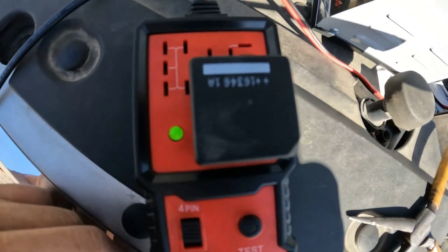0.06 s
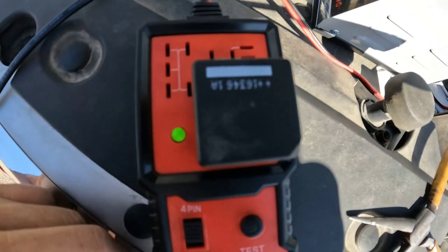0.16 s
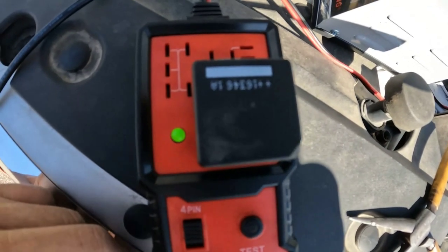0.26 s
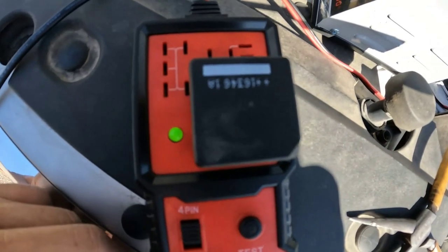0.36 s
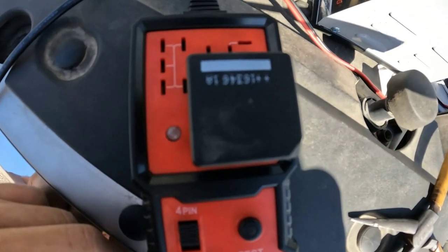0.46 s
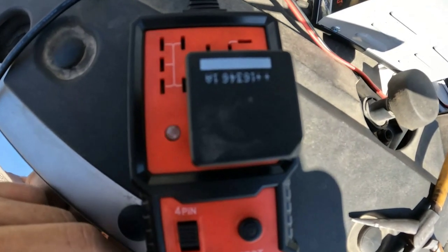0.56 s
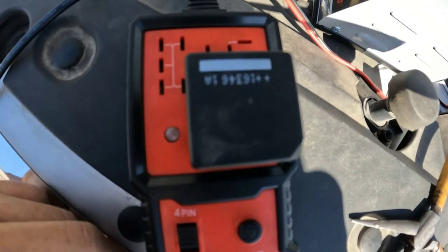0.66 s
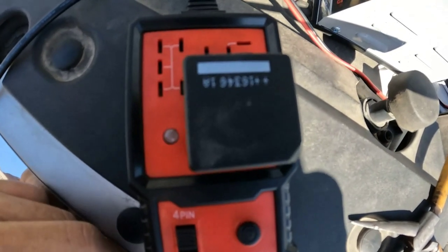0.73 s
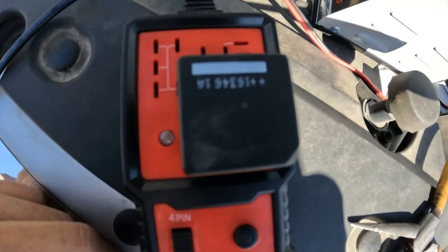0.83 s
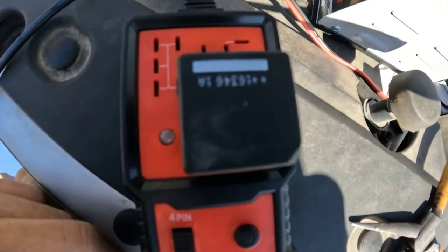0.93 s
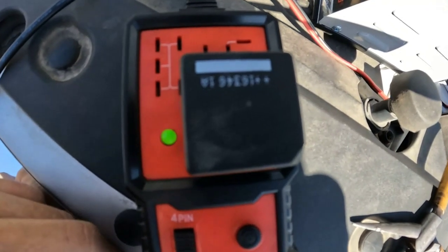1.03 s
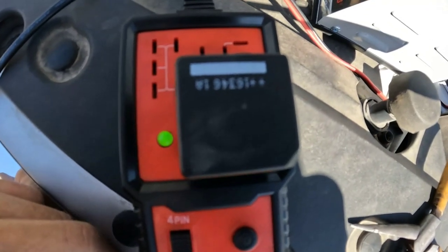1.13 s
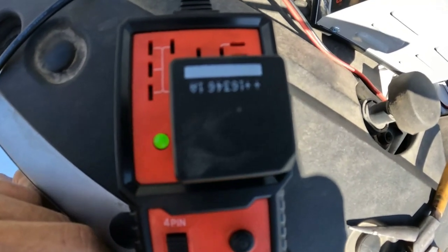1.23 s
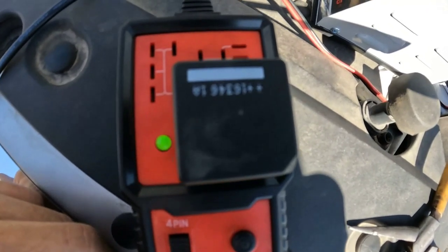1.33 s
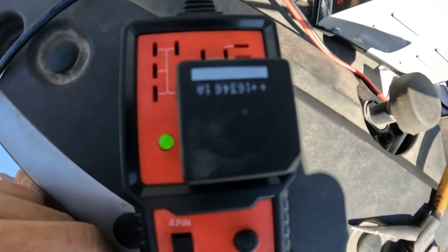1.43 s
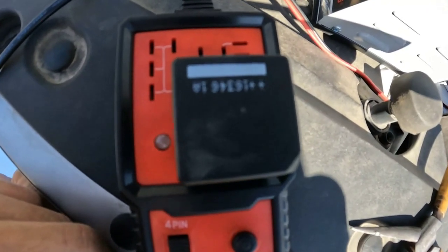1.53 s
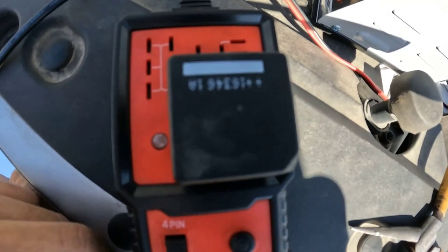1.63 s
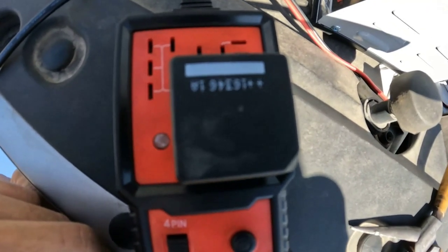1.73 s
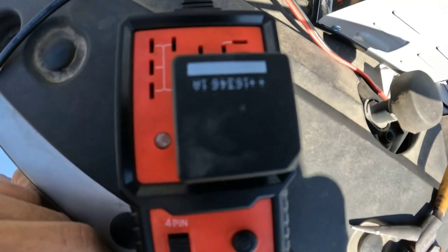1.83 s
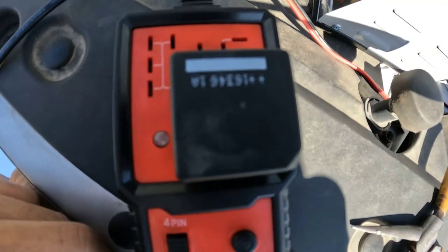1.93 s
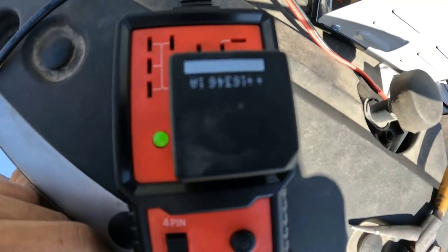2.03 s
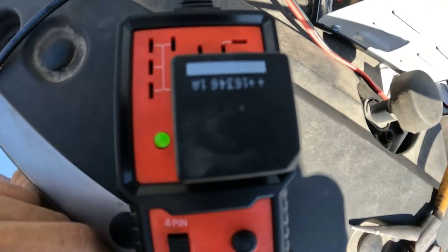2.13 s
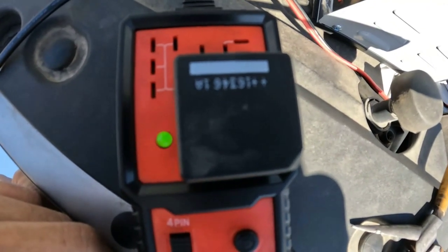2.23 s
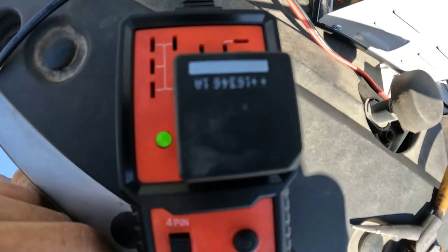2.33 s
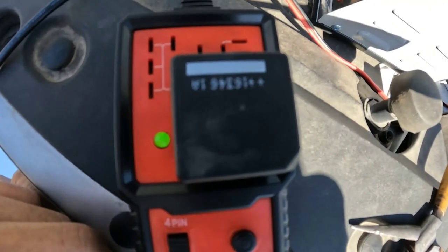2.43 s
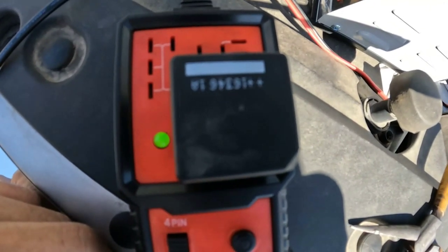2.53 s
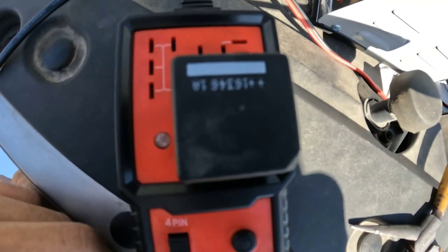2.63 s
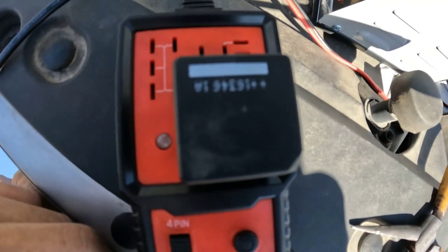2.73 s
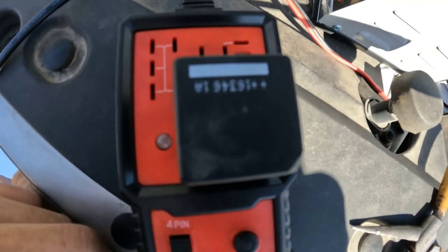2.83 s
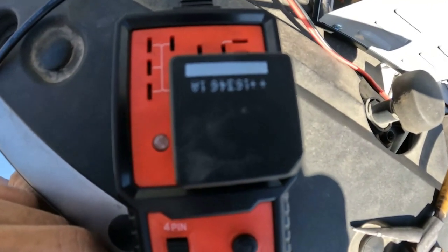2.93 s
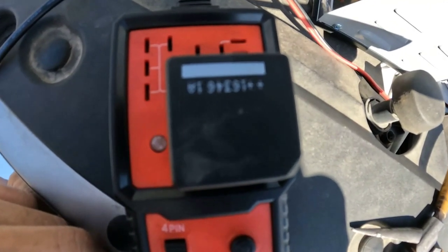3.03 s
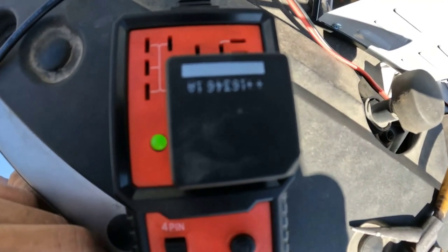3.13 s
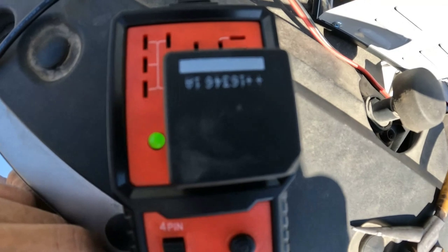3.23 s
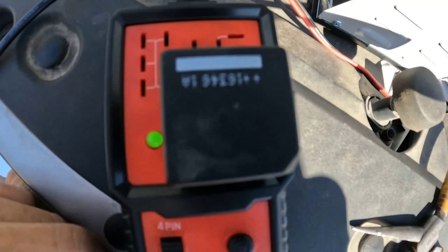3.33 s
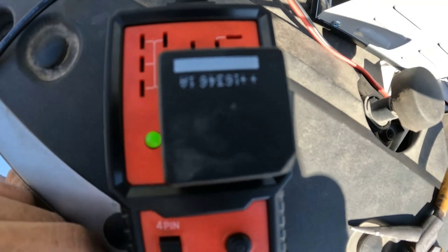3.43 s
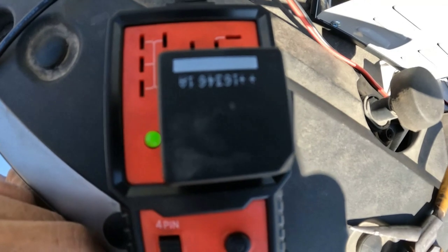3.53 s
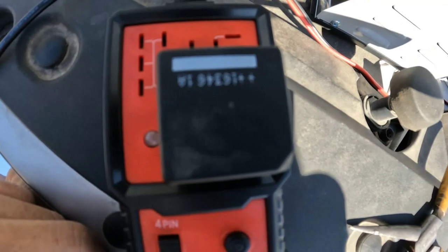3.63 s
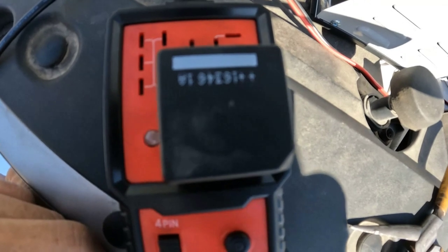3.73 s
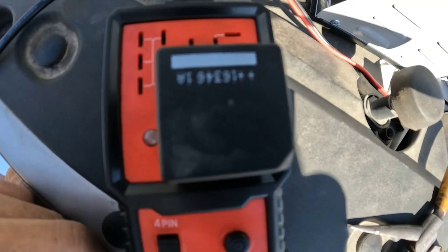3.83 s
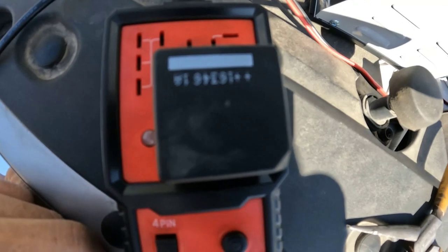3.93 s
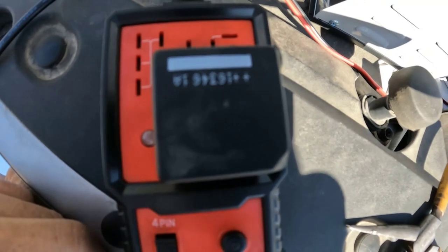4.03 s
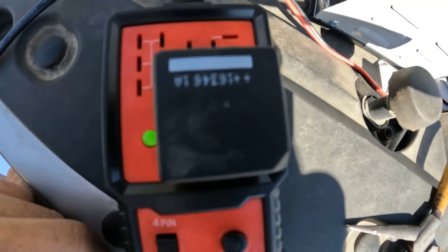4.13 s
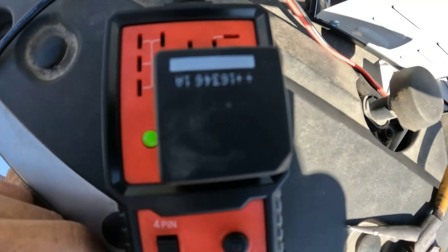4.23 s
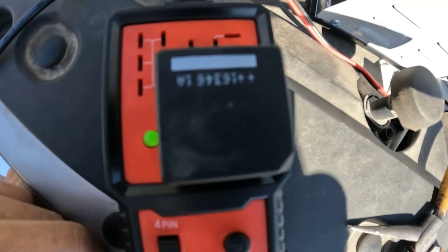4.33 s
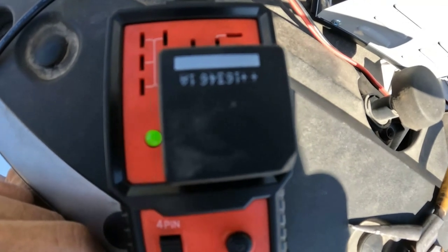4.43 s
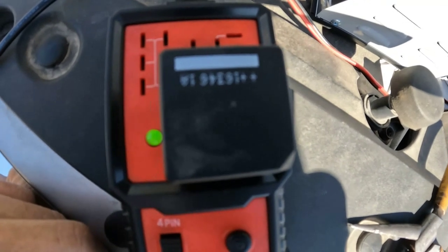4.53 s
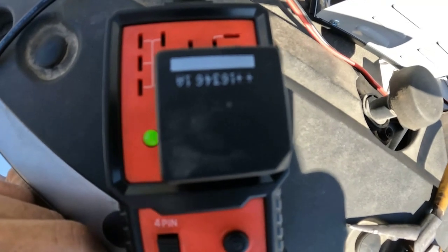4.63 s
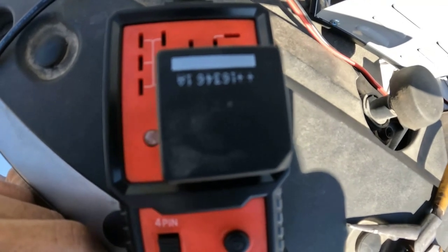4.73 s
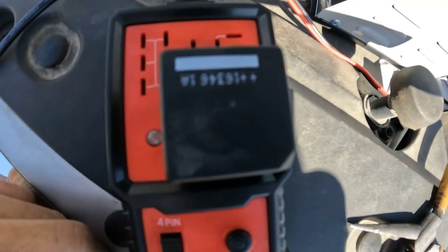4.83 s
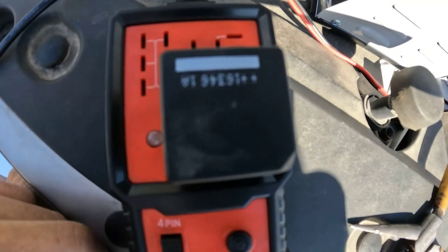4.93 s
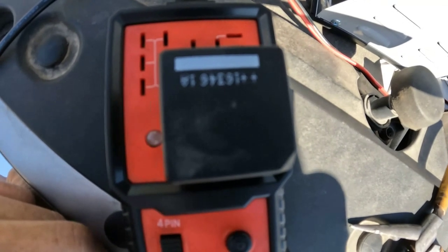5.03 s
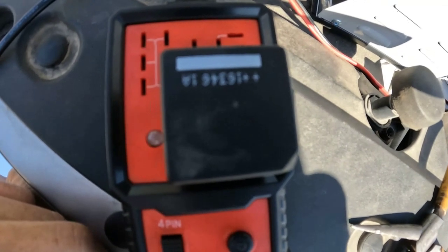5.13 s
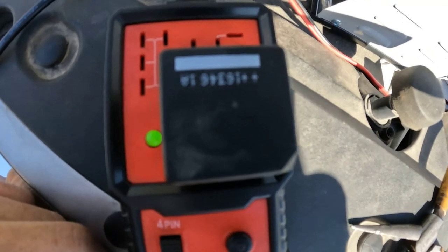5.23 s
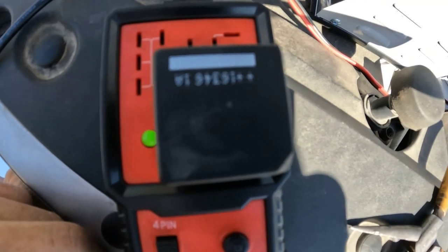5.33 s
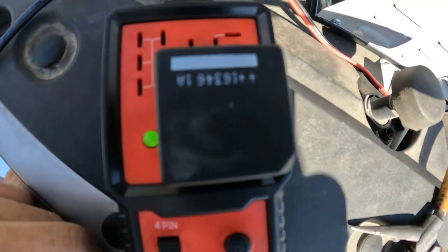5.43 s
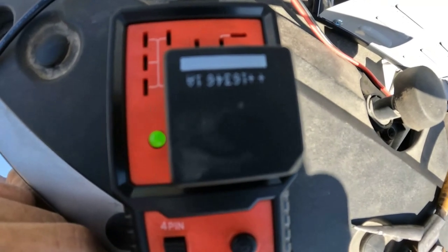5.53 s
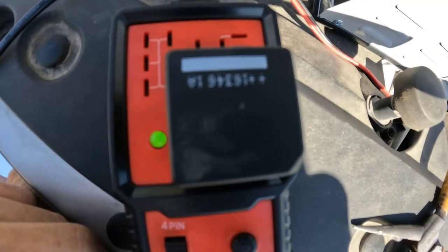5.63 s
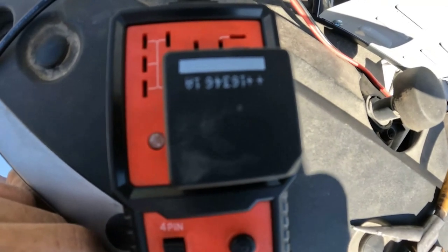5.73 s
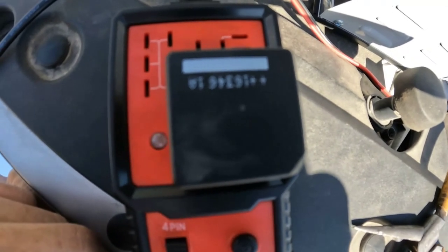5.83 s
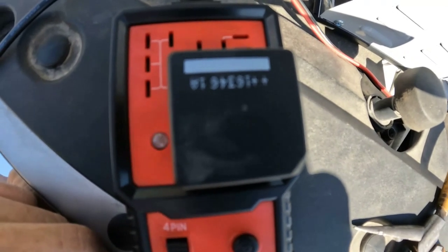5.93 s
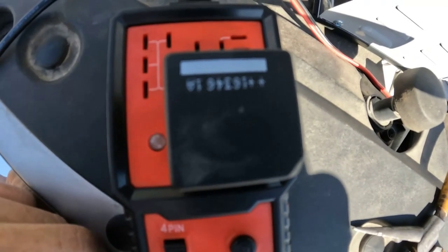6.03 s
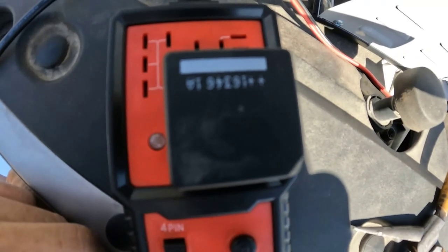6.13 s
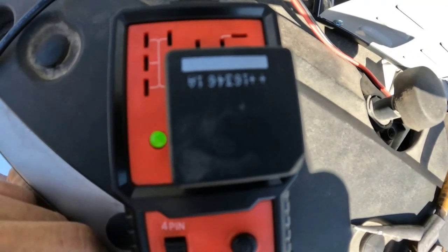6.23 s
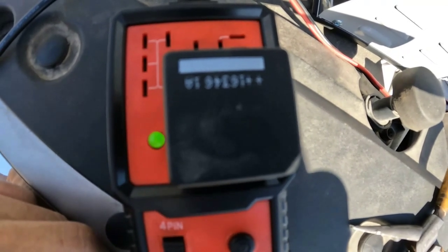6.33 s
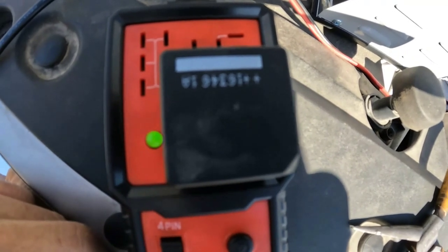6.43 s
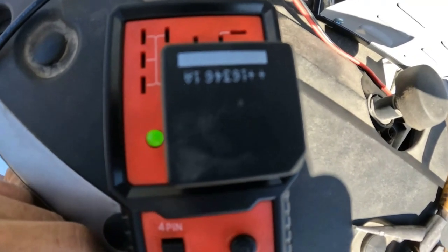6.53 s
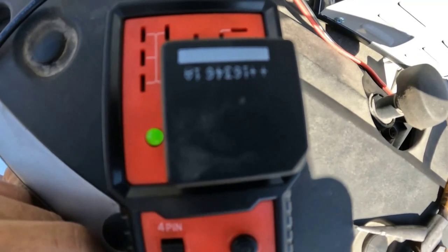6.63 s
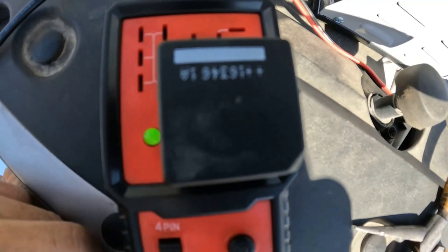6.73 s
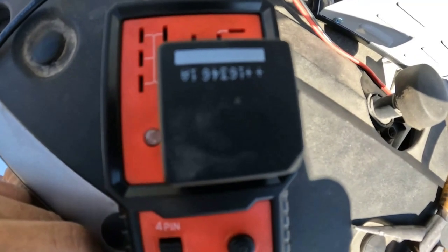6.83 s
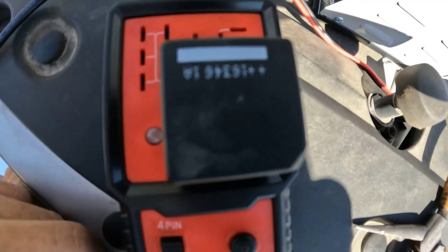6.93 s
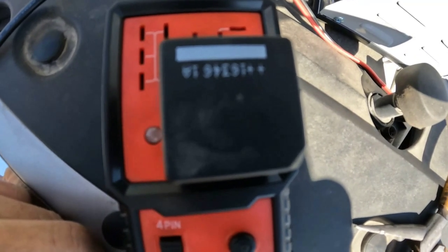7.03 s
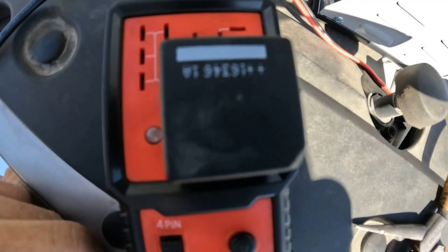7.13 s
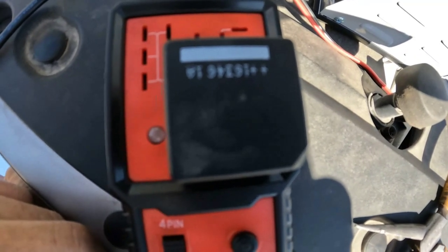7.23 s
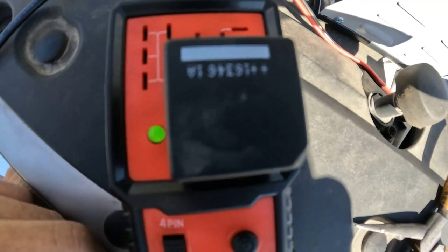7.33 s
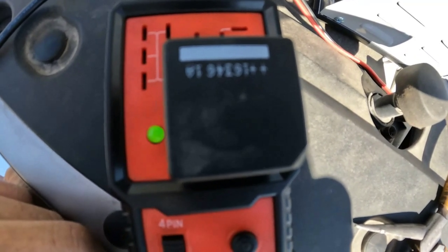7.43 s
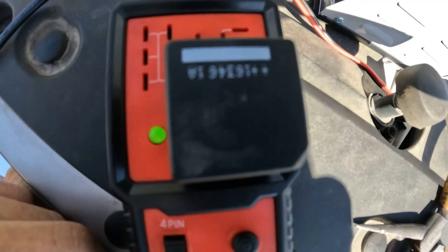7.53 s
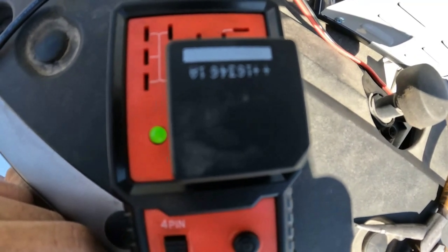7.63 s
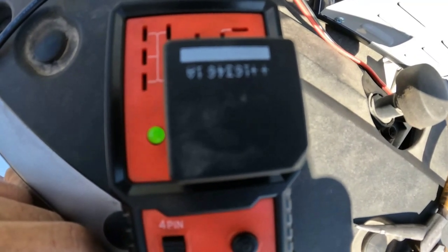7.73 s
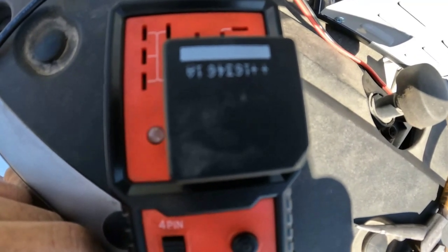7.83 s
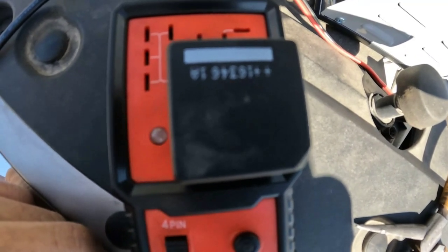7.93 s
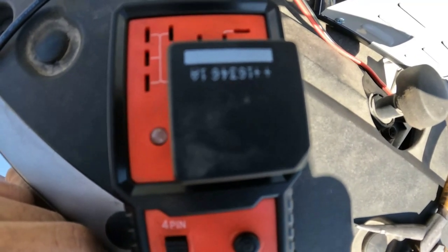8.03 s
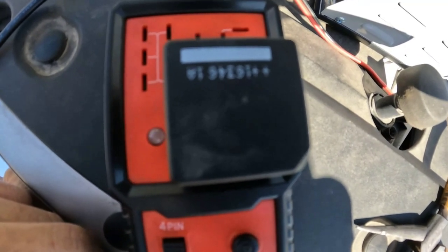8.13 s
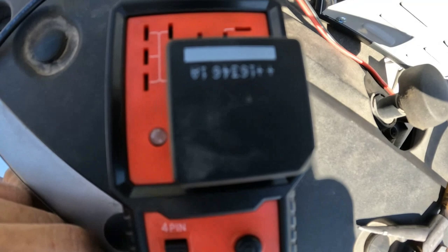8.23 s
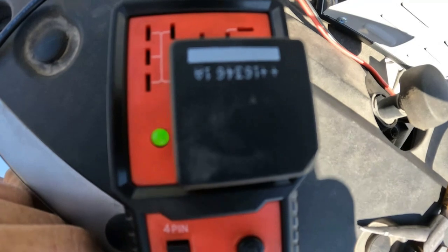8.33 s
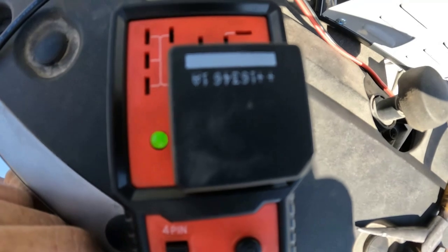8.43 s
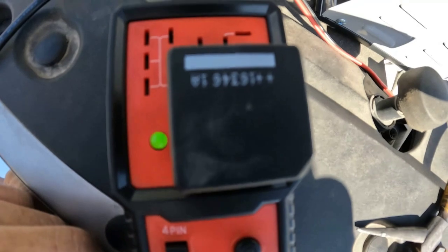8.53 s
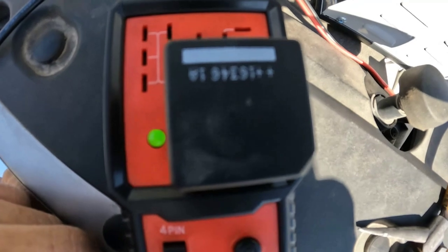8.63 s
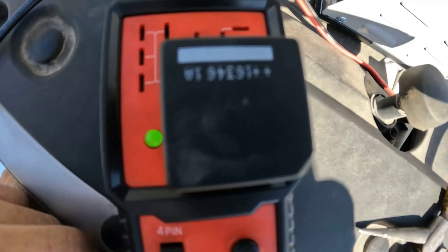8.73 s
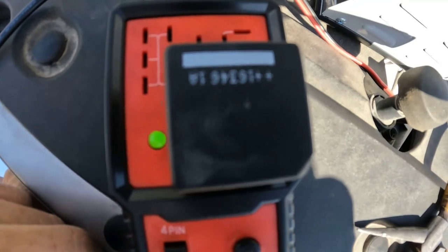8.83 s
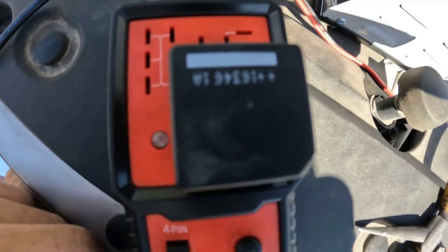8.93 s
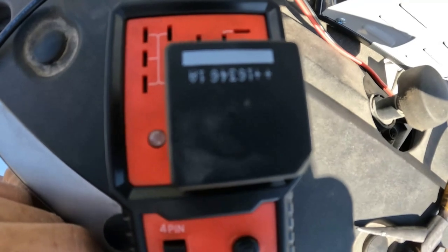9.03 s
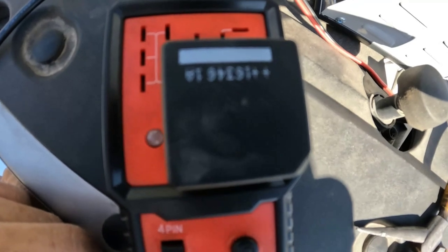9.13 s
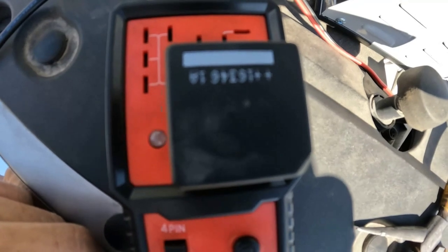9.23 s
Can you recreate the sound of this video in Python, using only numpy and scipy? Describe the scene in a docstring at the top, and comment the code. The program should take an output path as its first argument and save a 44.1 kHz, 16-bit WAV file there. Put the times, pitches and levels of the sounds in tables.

```python
"""Relay test in gusty wind

A hand-held tester's timer pulls a car relay in and lets it drop out about once a second, up close.
Each stroke rings the armature, the contacts, then the plastic housing; the spring rings on and the
engine bay echoes. Gusts flutter and buffet the microphone with a low rumble. Behind them sit a
workshop's fans and a far motor that dies away early on."""
import sys
import numpy as np
from scipy import signal
from scipy.fft import rfft, irfft, next_fast_len
from scipy.io import wavfile
from scipy.ndimage import uniform_filter1d

SR = 44100
rng = np.random.default_rng(int(sys.argv[2]) if len(sys.argv) > 2 else 0)


def to_wav(s):
    """Save 16-bit WAV."""
    ch = np.atleast_2d(s).T  # columns
    pcm = np.round(np.clip(ch, -1, 1) * 32767)  # PCM
    wavfile.write(sys.argv[1], SR, pcm.astype(np.int16))


N = 408807
T = np.arange(N) / SR

# modes of relay and housing, armature closed and open: pitch_hz, level_db, usual_t60_ms, onset_lag_ms
CLOSED_MODES = [(498, -21.3, 25.4, 1.38), (689, -18.2, 19.3, 3.12), (1151, -29.9, 40.0, 0.0),
                (1385, -33.7, 40.0, 0.23), (1701, -21.2, 9.1, 0.27), (2017, -37.3, 40.0, 1.38),
                (2123, -18.1, 9.3, 0.27), (2778, -26.9, 19.5, 0.25), (2984, -28.5, 17.9, 0.66),
                (3164, -28.3, 40.0, 0.41), (3368, -15.2, 13.6, 0.0), (4364, -30.6, 25.7, 0.39),
                (5108, -29.4, 15.9, 1.31), (5833, -15.5, 19.4, 1.06), (5763, -24.0, 21.3, 1.41),
                (6109, -10.0, 3.0, 1.02), (7800, -28.7, 13.6, 1.15), (8641, -17.6, 5.1, 0.43),
                (9092, -39.7, 26.3, 0.09), (10322, -30.3, 9.3, 1.44), (11915, -24.5, 5.8, 1.11),
                (13237, -54.2, 13.8, 1.29), (14313, -50.7, 4.9, 1.2)]
OPEN_MODES = [(433, -26.8, 40.0, 4.5), (550, -28.0, 29.4, 3.22), (695, -15.2, 29, 4.97),
              (800, -17.3, 32.0, 3.12), (988, -21.4, 18.7, 1.97), (1264, -25.3, 40.0, 0.77),
              (1474, -14.1, 16.8, 0.08), (1626, -20.4, 40.0, 0.0), (2101, -22.3, 10.2, 1.13),
              (2230, -29, 40.0, 1.37), (2716, -34.5, 40.0, 1.47), (3255, -23.8, 27.1, 1.12),
              (3464, -29.6, 40.0, 1.26), (3594, -25.6, 16.6, 1.46), (3948, -36.1, 40.0, 2.15),
              (4704, -25.0, 10.1, 2.34), (5573, -38.1, 40.0, 2.46), (5992, -29.6, 13.2, 2.25),
              (6632, -36.1, 19.0, 1.48), (7031, -26.1, 10.3, 1.7), (7534, -37.7, 20.7, 2.12),
              (9151, -30.1, 6.5, 1.89), (12110, -42.6, 6.0, 2.32)]
# ring of the return spring and frame: pitch_hz, t60_s, pull_in_db, drop_out_db
SPRING_MODES = [(418, .13, -44, -40), (479, .13, -38, -36), (1235, .33, -51.5, -44.5),
                (1453, .12, -54, -50), (1815, .14, -45, -46), (2207, .16, -42.5, -53),
                (2262, .12, -56, -49), (2422, .14, -68, -53), (2764, .13, -55, -53), (3009, .145, -46, -63),
                (3106, .14, -50, -58), (3276, .125, -48, -53), (3682, .11, -58, -53), (3758, .12, -64, -55),
                (4495, .12, -64, -56), (4549, .12, -58, -65), (4613, .11, -56, -59), (5674, .09, -56, -63),
                (6035, .11, -63, -60), (6228, .125, -51.5, -61), (6950, .09, -70, -60),
                (8796, .08, -59, -72), (11800, .08, -62, -80)]
# how each click sounds, a row per cycle: level_db, treble_db, cutoff_hz, treble_ring_ratio, chatter_db
PULL_INS = [(-1.4, 4, 16000, 1, 0), (-.3, 0, 11500, 1.05, 0), (.1, -.8, 13500, 1.05, -1),
            (.8, -.7, 16000, 1, 4), (.6, -1.3, 14500, .55, -4), (.2, -.3, 16000, 1.1, 0),
            (-.2, -.3, 14500, 1.15, -1), (.3, -.5, 16000, 1, 1), (.3, -.9, 12600, .95, -1)]
DROP_OUTS = [(-.4, -.1, 12200, 1.1, 0), (-.8, -1.2, 12600, 1, -3), (.6, -2.5, 12800, 1, 1),
             (.2, -2, 12600, 1, 0), (.5, -4.8, 12000, .9, 4), (0, -1, 12200, 1.1, 1), (.3, .3, 12400, 1, 0),
             (.3, -.3, 12100, .85, 1), (-.2, .7, 10000, 1, -1)]
# the dropped armature rebounds from its stop: usual_delay_s, level_db
BOUNCES = [(.013, -41), (.021, -41), (.027, -50)]
# stray chatter of a closed contact: start_s, level_db
LATE_CHATTER = [(3.249, -45), (3.255, -42), (3.260, -47), (4.836, -44), (4.840, -49)]
# tone colours of the relay's rattles and the plastic's ticks: frequency_hz, relative_db
CONTACT_COLOUR = [(800, -25), (2500, -4), (4500, -2), (7500, -2), (10000, -10), (12500, -16),
                  (14000, -40)]
HOUSING_COLOUR = [(250, -24), (450, 1), (900, -3), (2200, -3), (3500, -5), (5000, -11), (8000, -17),
                  (12000, -23), (15000, -40)]
REBOUND_COLOUR = [(800, -10), (2300, 2), (3600, 0), (5600, -5), (8000, -14), (12000, -28)]
PLASTIC_COLOUR = [(1200, -25), (2200, -13), (2900, -12), (3350, 0), (3900, -20), (6000, -27),
                  (9000, -50), (12000, -70)]
# faint ticks of the plastic in the hand: start_s, level_db
PLASTIC_TICKS = [(.27, -59.5), (.897, -55.5), (2.272, -63)]
# the tester's image at the two microphone ports: frequency_hz, left_minus_right_db, left_lead_rad
PORT_IMAGE = [(300, -3.3, .1), (1000, -2.5, .1), (2000, -1.2, -.2), (2900, -3.5, -.7), (3600, -1, -.5),
              (5700, 0, -.3), (7000, -.5, 0), (12500, 2.3, .1)]
# the hand shifts its grip: centre_s, half_length_s, level_db
RUSTLES = [(.04, .1, -69), (.91, .115, -71), (1.02, .03, -75), (1.79, .09, -79), (2.28, .02, -75)]
# tone colour of skin on plastic: frequency_hz, relative_db
RUSTLE_COLOUR = [(1500, -25), (3300, -3), (4200, -6), (5500, 0), (8000, -4), (11000, -11), (14000, -34)]
# gusts at the microphone: start_s, hold_s, large_eddy_db, small_eddy_relative_db
GUSTS = [(.3, .25, -40, -12), (1.36, .04, -27.5, -12), (1.45, .22, -35, -12), (1.945, .06, -32, -11),
         (2.46, .16, -43.5, -2), (2.88, .23, -30, -13), (3.16, .59, -30, -12), (4.18, .12, -35.5, -8),
         (4.4, .05, -34.5, -11), (4.64, .05, -34.5, -13), (4.83, .15, -34.5, -6), (5.16, .05, -36.5, -7),
         (5.49, .3, -33.5, -11), (5.61, .24, -27, -13), (5.87, .12, -30, -6), (6.1, .12, -32.5, -13),
         (6.31, .25, -39.5, -10), (7.05, .06, -43, -18), (7.33, .09, -41, -18), (7.73, .14, -32, -10),
         (7.94, .46, -34.5, -10), (8.12, .2, -26, -12), (8.7, .54, -35.5, -11), (8.81, .44, -28, -17),
         (8.98, .18, -28, -7)]
# the light breeze under the gusts: time_s, level_db
BREEZE = [(0, -42.5), (1.2, -40), (2.4, -41), (4, -45), (6.1, -43), (6.9, -47), (8.3, -44.5), (8.7, -38),
          (9.27, -42)]
# single wind thumps: centre_s, level_db, pitch_hz
BUFFETS = [(.512, -28, 150), (1.377, -15, 140), (1.388, -15, 125), (1.397, -20, 180), (1.474, -21, 150),
           (1.523, -28, 160), (1.951, -22, 130), (1.962, -18, 195), (2.903, -22, 125), (2.993, -22, 150),
           (3.018, -21, 160), (3.032, -21, 70), (3.097, -21, 235), (3.104, -23, 140), (3.184, -19.5, 185),
           (3.272, -25, 180), (3.293, -21, 80), (3.35, -22, 80), (3.414, -16.5, 85), (3.432, -23, 195),
           (3.473, -27, 185), (3.532, -20, 100), (3.588, -27, 180), (3.622, -26, 200), (3.652, -18, 90),
           (3.665, -25, 200), (3.738, -25, 170), (4.192, -27, 170), (4.412, -29, 160), (4.676, -29, 160),
           (4.88, -22, 205), (5.508, -29, 160), (5.565, -25, 220), (5.588, -18, 170), (5.629, -19, 110),
           (5.66, -20.5, 230), (5.674, -18, 115), (5.692, -18, 280), (5.729, -19.5, 150), (5.768, -17, 100),
           (5.838, -15, 100), (6.187, -24.5, 175), (6.212, -24, 70), (6.32, -25, 70), (6.395, -24, 70),
           (6.434, -23.5, 160), (6.462, -26, 70), (6.535, -27, 85), (8.128, -14, 70), (8.15, -15, 80),
           (8.16, -21, 210), (8.2, -17, 190), (8.207, -13, 215), (8.218, -17, 130), (8.28, -17, 120),
           (8.337, -24, 140), (8.712, -23, 85), (8.755, -25, 85), (8.942, -22, 150), (9.0, -15, 150),
           (9.03, -12.5, 130), (9.055, -14, 175), (9.063, -17, 130), (9.124, -16, 140), (9.157, -26, 430),
           (9.158, -12, 115), (9.25, -26, 200)]
# tone colour of the workshop fans: frequency_hz, relative_db
FAN_COLOUR = [(25, -12), (90, -18), (200, -20), (290, -13), (400, -19), (620, -16), (820, -35), (1050, -25),
              (1330, -24.5), (1600, -29.7), (1900, -27.7), (2250, -39.5), (3100, -45.3), (3700, -44),
              (4400, -48), (6200, -47.5), (8000, -56), (11000, -78)]
# thin fan tones: pitch_hz, level_db
FAN_TONES = [(594, -72), (1012, -77.5), (1308, -76), (1351, -74), (1857, -81), (1900, -83), (3677, -96)]
# fade of the far motor: time_s, level_db
MOTOR_FADE = [(0, -41), (.6, -39.5), (1.1, -41), (1.35, -52), (2.4, -54), (3, -70)]
# swell of a soft rush of air: time_s, level_db
RUSH_SWELL = [(0, -85), (1.9, -74), (2.3, -61), (2.65, -57), (2.85, -49), (3.15, -54), (3.5, -64),
              (4.2, -85)]
# tone colour of that rush: frequency_hz, relative_db
RUSH_COLOUR = [(100, -12), (300, -5), (410, 0), (520, 1.5), (600, -7), (1100, -7.5), (1500, -22),
               (2200, -38), (8000, -70)]

FIRST_PULL_S, CYCLE_S, COIL_ON_S = .09175, 1.04787, .53205
TRAVEL_S, LIFT_S = .011, .0065  # a contact parts this long before the snap, and before the clack
TREBLE_HZ = 5500  # modes above this feel fully how the armature seats
SPRING_SCATTER_DB = 3.2  # each blow shares its energy differently among the spring's modes
GUST_ATTACK_S, GUST_RELEASE_S = .014, .03  # time constants
FLUTTER_PER_S, FLUTTER_DB = 36, 2.3
BREEZE_SMALL_DB, BREEZE_WANDER_DB = -9.5, 1.5  # small eddies against large; depth of the slow swell
FINE_EDDY_DB, PUFF_DB = -20, 4  # both ride on the small-eddy envelope
PUFFS_PER_S, PUFF_CENTRE_HZ = 5, 145  # lesser buffets at random times
BUFFET_ROUNDNESS = 6.5  # low: one sharp swing; high: several soft ones
FAN_DB = -57.3


def relay():
    """Bright snaps as the coil pulls the armature in; duller clacks as the spring throws it back."""
    out = np.zeros(N)
    _, _, pull_db, drop_db = np.transpose(SPRING_MODES)
    for cycle, (db, treble_db, cutoff_hz, seating, chatter_db) in enumerate(PULL_INS):
        s = FIRST_PULL_S + cycle * CYCLE_S
        lift = rattle(REBOUND_COLOUR, db=-41.5, start=0, t60=.022)
        lift += rattle(CONTACT_COLOUR, db=-48, start=.001, t60=.07)
        add(out, s - TRAVEL_S, lift)
        snap = stroke(CLOSED_MODES, pull_db, seating, scatter_db=.5, detune=.0012)
        chatter = rattle(CONTACT_COLOUR, db=-36 + chatter_db, start=.001, t60=.022)
        housing = rattle(HOUSING_COLOUR, db=-42.5, start=.004, t60=.08)
        add(out, s, click_tone(snap + chatter + housing, db, treble_db, cutoff_hz))
    for cycle, (db, treble_db, cutoff_hz, seating, chatter_db) in enumerate(DROP_OUTS):
        s = FIRST_PULL_S + COIL_ON_S + cycle * CYCLE_S
        lift = rattle(REBOUND_COLOUR, db=-42, start=0, t60=.04)
        add(out, s - LIFT_S, lift)
        clack = stroke(OPEN_MODES, drop_db, seating, scatter_db=.7, detune=.0025)
        chatter = rattle(CONTACT_COLOUR, db=-38 + chatter_db, start=.0008, t60=.03)
        for usual_delay_s, bounce_db in BOUNCES:
            delay_s = usual_delay_s * rng.uniform(.9, 1.1)
            chatter += rattle(REBOUND_COLOUR, db=bounce_db + chatter_db, start=delay_s, t60=.014)
        housing = rattle(HOUSING_COLOUR, db=-36, start=.005, t60=.068)
        add(out, s, click_tone(clack + chatter + housing, db, treble_db, cutoff_hz))
    for s, db in LATE_CHATTER:
        add(out, s, rattle(CONTACT_COLOUR, db=db, start=0, t60=.018))
    return out


def stroke(modes, spring_db, seating, scatter_db, detune):
    """One blow of the armature spreads through the parts, varying most in the treble; the spring sings."""
    t = T[:SR // 3]
    body = 0
    for hz, db, t60_ms, lag_ms in modes:
        pitch_jitter, level_jitter = rng.standard_normal(2)
        treble = min(hz / TREBLE_HZ, 1) ** 2
        t60 = t60_ms / 1000 * seating ** treble
        level_db = db + scatter_db * (1 + treble) * level_jitter
        body += ring(t - lag_ms / 1000, hz * (1 + detune * pitch_jitter), level_db, t60)
    tail_db = spring_db + SPRING_SCATTER_DB * rng.uniform(-1, 1, len(SPRING_MODES))
    tail = sum(ring(t, hz, db, t60) for (hz, t60, *_), db in zip(SPRING_MODES, tail_db))
    return body + tail


def ring(t, hz, db, t60):
    """One damped mode, silent before t = 0."""
    t = np.maximum(t, 0)
    return undb(db - 60 * t / t60) * np.sin(2 * np.pi * hz * t)


def rattle(colour, db, start, t60):
    """Dense tiny impacts that set in start seconds after the blow and die away."""
    t = T[:SR // 3]
    grain_sizes = undb(-1 + 4.5 * rng.standard_normal(len(t) // 16 + 1)).repeat(16)[:len(t)]
    grains = noise(colour, size=len(t)) * uniform_filter1d(grain_sizes, size=8)
    attack = np.clip((t - start) / .001, 0, 1)
    return grains * attack * undb(db - 60 * np.maximum(t - start, 0) / t60)


def click_tone(x, db, treble_db, cutoff_hz):
    """Sets each click's loudness and brightness separately; its own high cut makes some sound duller."""
    low = filt(x, 4000, "low", order=1)
    return undb(db) * filt(low + undb(treble_db) * (x - low), cutoff_hz, "low", order=10)


def tester():
    """The relay and faint ticks of plastic, close and a little to the right, with their reflections."""
    clicks = filt(relay(), 190, "high")  # the small housing radiates little bass
    for s, db in PLASTIC_TICKS:
        add(clicks, s, rattle(PLASTIC_COLOUR, db=db, start=.001, t60=.045))
    direct = undb(.2) * microphone_ports(clicks)
    glance = hand_reflection(clicks, db=-15, lag_s=.0011, low_hz=3000)
    return direct + glance + engine_bay(clicks, wet_db=-24, t60=.17, dull_hz=2300, width=.6)


def microphone_ports(x):
    """Sound bends round the microphone's body, so each port gets its own level and phase."""
    hz, pan_db, lead_rad = np.transpose(PORT_IMAGE)
    full = next_fast_len(N)
    f = np.fft.rfftfreq(full, 1 / SR)
    left = undb(np.interp(f, hz, pan_db) / 2) * np.exp(.5j * np.interp(f, hz, lead_rad))
    return irfft(rfft(x, full) * np.array([left, 1 / left]), full)[:, :N]


def hand_reflection(x, db, lag_s, low_hz):
    """The treble glances off the hand and meets the two ports in opposite polarity."""
    late = np.interp(T - lag_s, T, filt(x, low_hz, "high"), left=0)
    return undb(db) * stereo(0, late, 0)


def engine_bay(x, wet_db, t60, dull_hz, width):
    """Dense, short, dull reflections from nearby metal and plastic."""
    t = T[:SR // 4]
    build_up = np.clip(t / .004 - 1, 0, 1)
    tails = rng.standard_normal((2, len(t))) * undb(-60 * t / t60) * build_up
    dull = filt(x, dull_hz, "low")
    mid, side = (signal.fftconvolve(dull, tail / np.linalg.norm(tail))[:N] for tail in tails)
    return undb(wet_db) * stereo(mid, width * side, pan_db=-1.5)


def wind():
    """Large eddies roll slowly and small ones flutter in fits; single buffets thump the microphone."""
    large_db, small_db = gust_envelopes()
    rumble = undb(large_db + 1.4) * eddies(25, 87, uneven_db=4)
    flutter = undb(small_db - 1.4 + 1.5 * wander(40)) * eddies(118, 180, uneven_db=6)
    fine = undb(small_db + FINE_EDDY_DB) * eddies(250, 400, uneven_db=6)
    side = undb(large_db - 14) * eddies(26, 105, uneven_db=3)
    side += undb(small_db - 10) * eddies(110, 220, uneven_db=5)
    bed = filt(stereo(rumble + flutter + fine, side, pan_db=-5.5), 900, "low", order=3)
    puffs = []
    for when, pitch in rng.random((int(PUFFS_PER_S * N / SR), 2)):
        s = T[SR // 12] + when * T[-SR // 12]
        puffs.append((s, np.interp(s, T, small_db) + PUFF_DB, PUFF_CENTRE_HZ * 2 ** (pitch - .5)))
    thumps = undb(-1.1) * stereo(buffets(list(BUFFETS) + puffs), 0, pan_db=-7.5)
    return bed + thumps


def gust_envelopes():
    """Large and small eddy levels in dB: fluttering gusts rise, hold and fall over a light breeze."""
    large_power = undb(curve(BREEZE) + BREEZE_WANDER_DB * wander(6)) ** 2
    small_power = large_power * undb(BREEZE_SMALL_DB) ** 2
    flutter = unit(undb(FLUTTER_DB * wander(FLUTTER_PER_S)))
    for start_s, hold_s, db, small_db in GUSTS:
        attack = np.exp(-np.maximum(start_s - T, 0) / GUST_ATTACK_S)
        release = np.exp(-np.maximum(T - start_s - hold_s, 0) / GUST_RELEASE_S)
        power = (undb(db) * attack * release * flutter) ** 2
        large_power += power
        small_power += power * flutter * undb(small_db) ** 2
    return 10 * np.log10(large_power), 10 * np.log10(small_power)


def eddies(low_hz, high_hz, uneven_db):
    """A band of turbulent pressure that comes in fits, levelled over a few swings."""
    fits = rng.standard_normal(N) * undb(uneven_db * wander(high_hz / 2))
    band = filt(filt(fits, high_hz, "low", order=4), low_hz, "high")
    return band / np.sqrt(smooth(band ** 2, SR // 25) + 1e-12)


def buffets(rows):
    """Each eddy presses slowly, swings sharply as it crosses the port, and lets go."""
    out = np.zeros(N)
    t = T[:SR // 12] - T[SR // 24]
    for s, db, hz in rows:
        swing = (1 - 2j * np.pi * hz * t / BUFFET_ROUNDNESS) ** -(BUFFET_ROUNDNESS + 1)
        add(out, s + t[0], undb(db) * swing.imag)
    return out


def grip():
    """Skin slides on the plastic: a thin, grainy hiss that swells and fades."""
    swell = sum(undb(db) * np.exp(-((T - s) / half_s) ** 2) for s, half_s, db in RUSTLES)
    return swell * undb(3.8 * wander(70)) * noise(RUSTLE_COLOUR)


def workshop():
    """Room tone: steady fans with a thin whine, a far motor's fading hum and a passing rush of air."""
    fans = undb(FAN_DB + .7 * wander(4)) * stereo(noise(FAN_COLOUR), .33 * noise(FAN_COLOUR), -1.3)
    whine = sum(undb(db + 2.5 * wander(6)) * hum(hz, drift_hz=4, per_s=25) for hz, db in FAN_TONES)
    motor = hum(95, drift_hz=2.5, per_s=14) * undb(curve(MOTOR_FADE) + 1.2 * wander(12))
    rush = undb(curve(RUSH_SWELL) + wander(14)) * noise(RUSH_COLOUR)
    return fans + stereo(whine + motor + rush, 0, pan_db=-1.5)


def hum(hz, drift_hz, per_s):
    """A sine of rms 1 whose pitch wavers."""
    return unit(np.sin(2 * np.pi * np.cumsum(hz + drift_hz * wander(per_s)) / SR))


def noise(colour, size=N):
    """Noise of rms 1, shaped by rows of frequency_hz, relative_db."""
    hz, db = np.transpose(colour)
    full = next_fast_len(size)
    f = np.maximum(np.fft.rfftfreq(full, 1 / SR), 1)
    gain = undb(np.interp(np.log(f), np.log(hz), db))
    return unit(irfft(rfft(rng.standard_normal(full)) * gain, full)[:size])


def wander(per_s):
    """Smooth random modulation of rms 1, with about per_s new values a second."""
    step = int(SR / per_s)
    return unit(smooth(np.repeat(rng.standard_normal(N // step + 1), step), step)[:N])


def smooth(x, samples):
    """Two passes of a moving average."""
    return uniform_filter1d(uniform_filter1d(x, samples), samples)


def curve(rows):
    """Straight ramps through rows of time_s, value."""
    return np.interp(T, *np.transpose(rows))


def filt(x, hz, kind, order=2):
    """Butterworth filter."""
    return signal.sosfilt(signal.butter(order, np.minimum(hz, .45 * SR), kind, fs=SR, output="sos"), x)


def stereo(mid, side, pan_db):
    """Left and right from mid and side; negative pan_db leans right."""
    return np.array([(mid + side) * undb(pan_db / 2), (mid - side) * undb(-pan_db / 2)])


def add(track, s, sound):
    """Mix a sound into the track from time s on."""
    i = int(round(s * SR))
    track[..., i:i + sound.shape[-1]] += sound[..., :N - i]


def undb(db):
    """Decibels to gain."""
    return 10 ** (np.asarray(db) / 20)


def unit(x):
    """Scale to rms 1."""
    return x / np.sqrt(np.mean(x ** 2))


def scene():
    """Tester and hand up front, wind on the microphone, workshop behind."""
    return tester() + grip() + wind() + workshop()


def record(dry):
    """A steep high cut takes off the very top."""
    return signal.sosfilt(signal.ellip(8, .2, 70, Wn=15500, fs=SR, output="sos"), dry)


dry = scene()
out = record(dry)
to_wav(out)
```